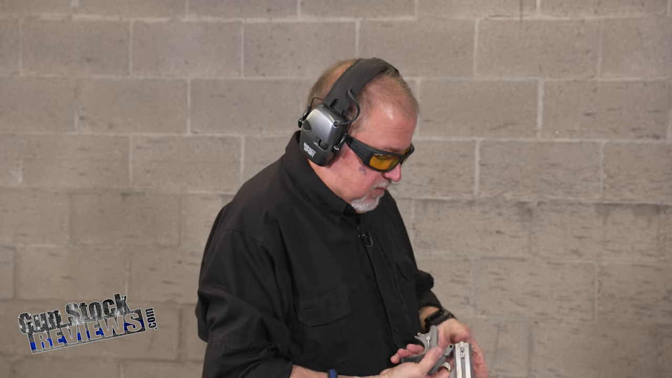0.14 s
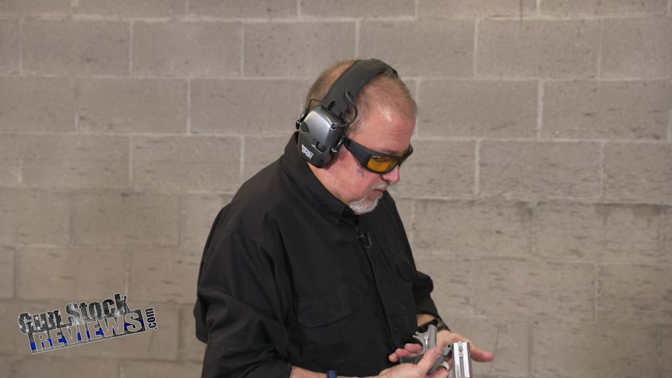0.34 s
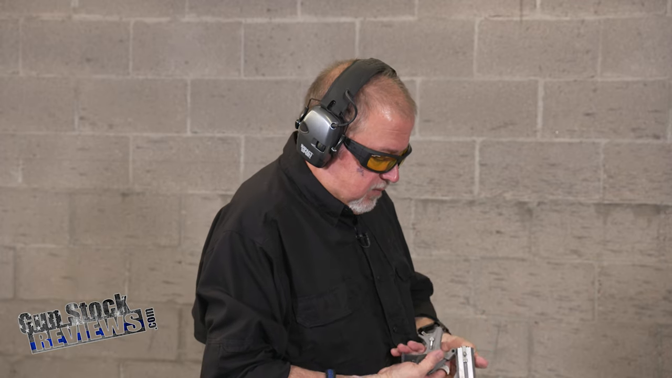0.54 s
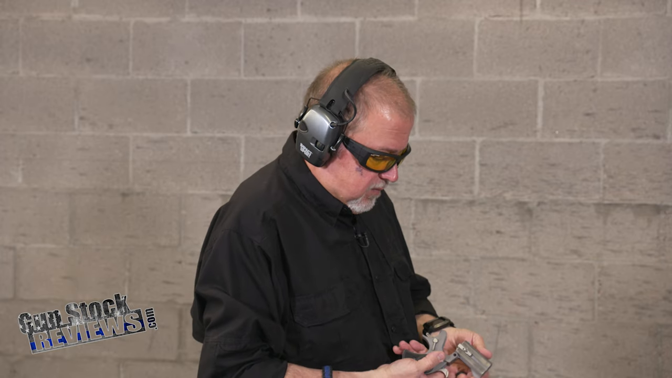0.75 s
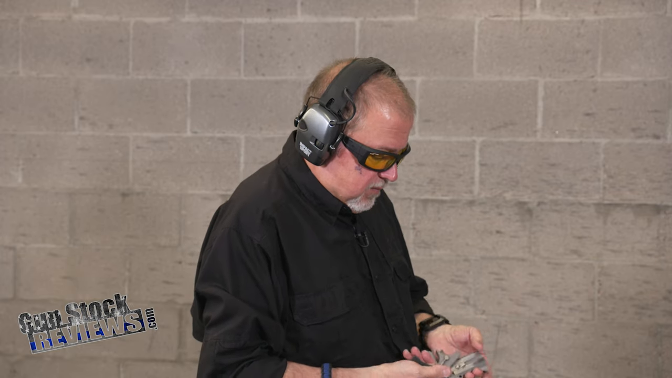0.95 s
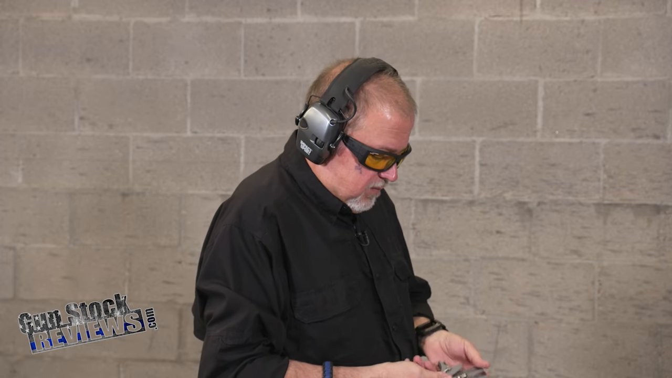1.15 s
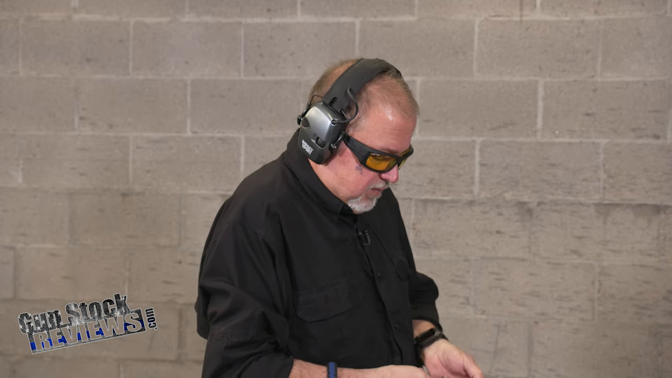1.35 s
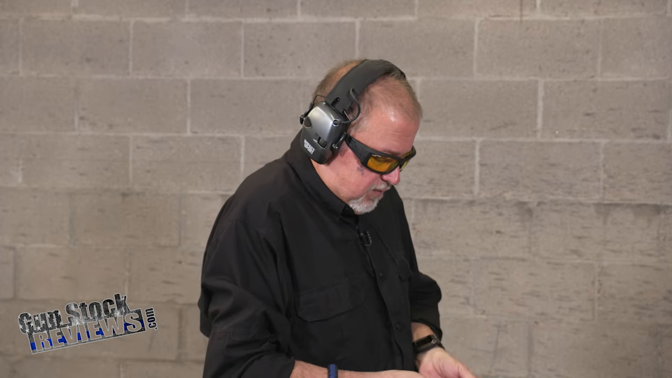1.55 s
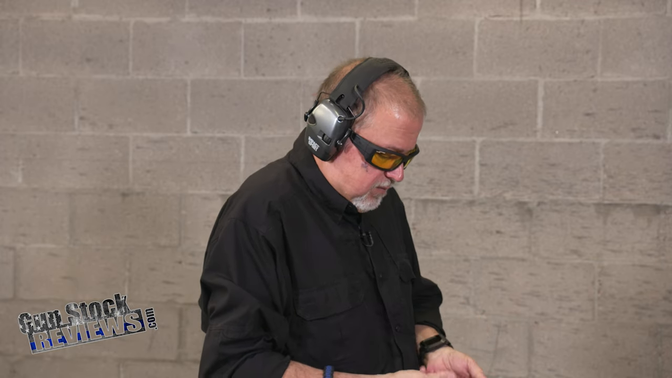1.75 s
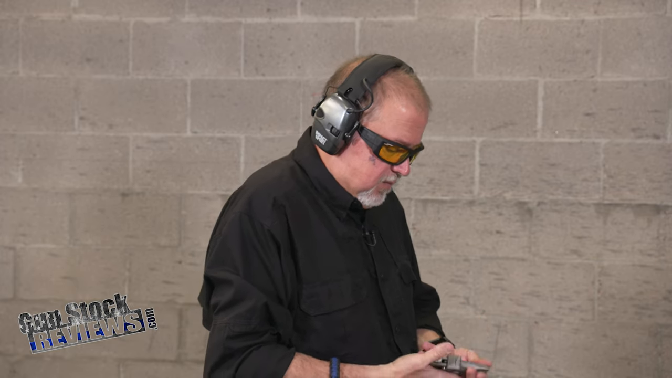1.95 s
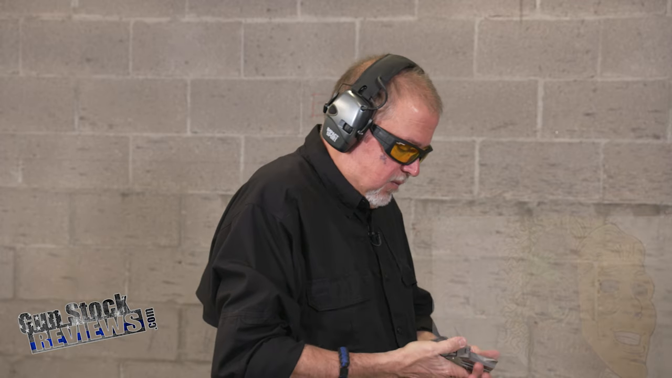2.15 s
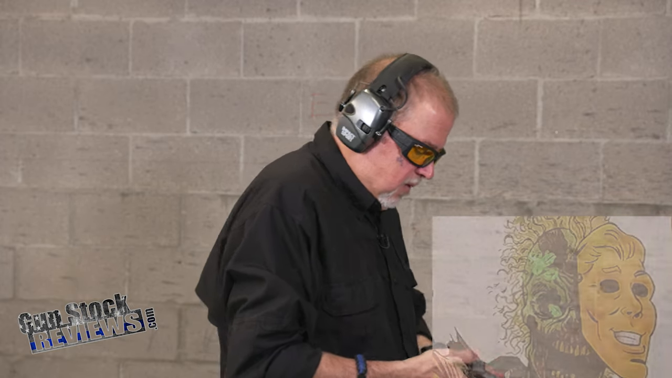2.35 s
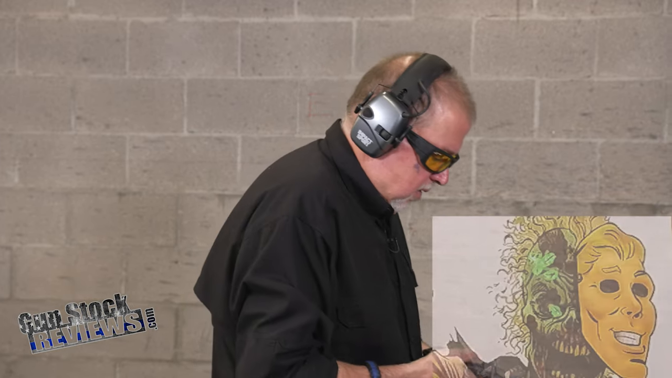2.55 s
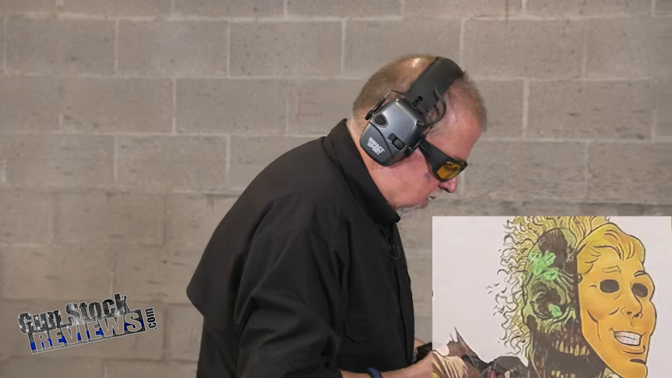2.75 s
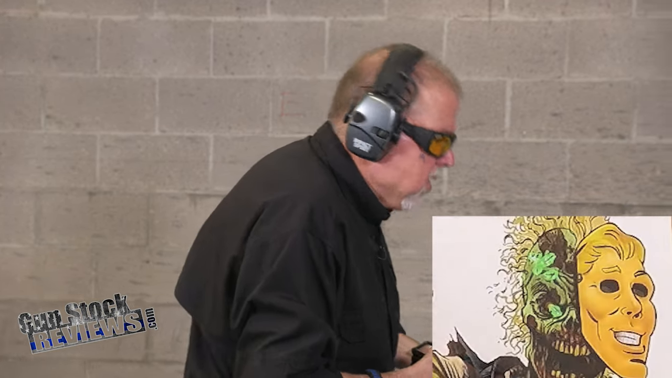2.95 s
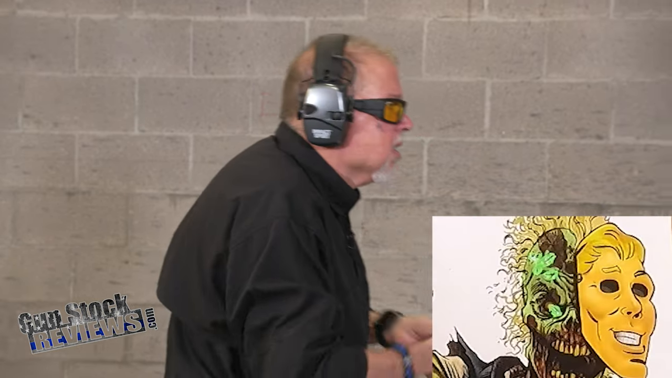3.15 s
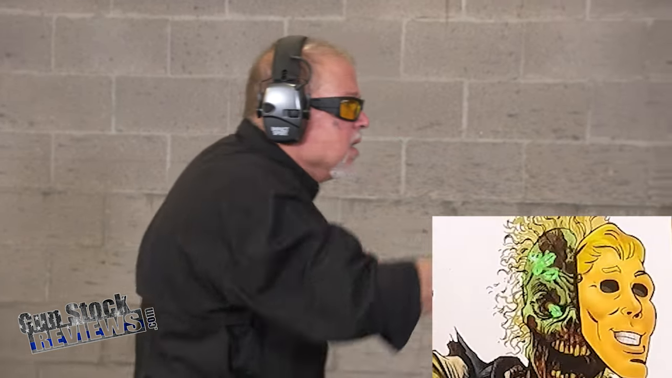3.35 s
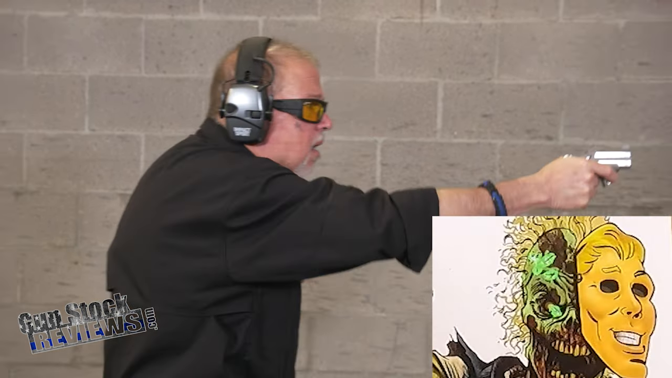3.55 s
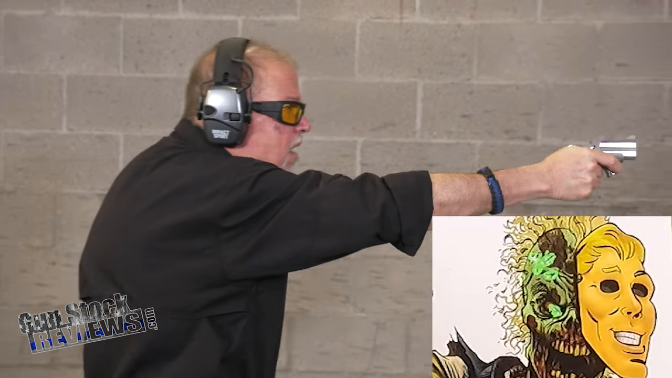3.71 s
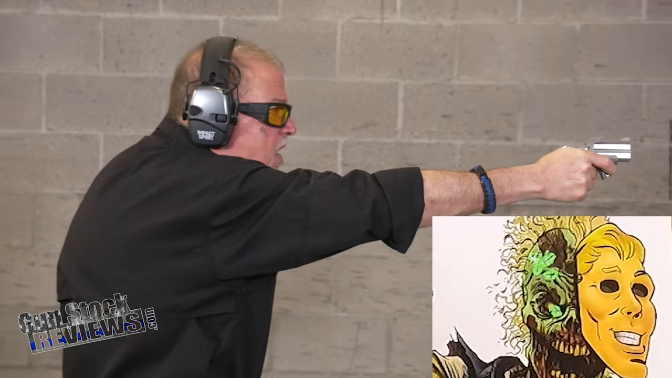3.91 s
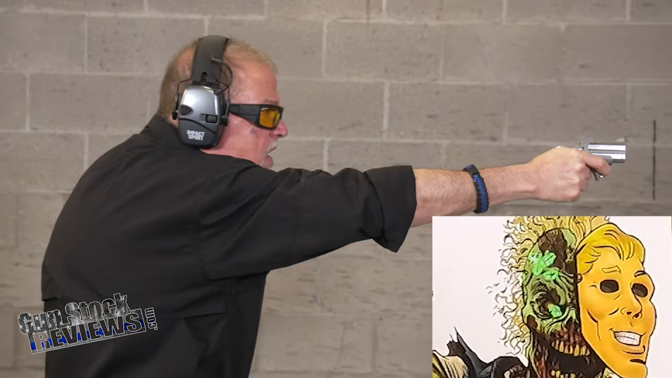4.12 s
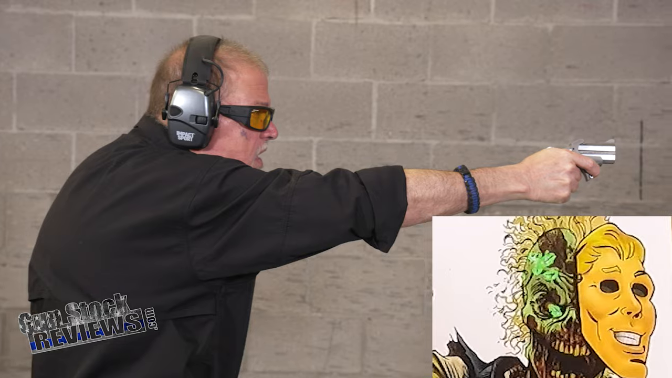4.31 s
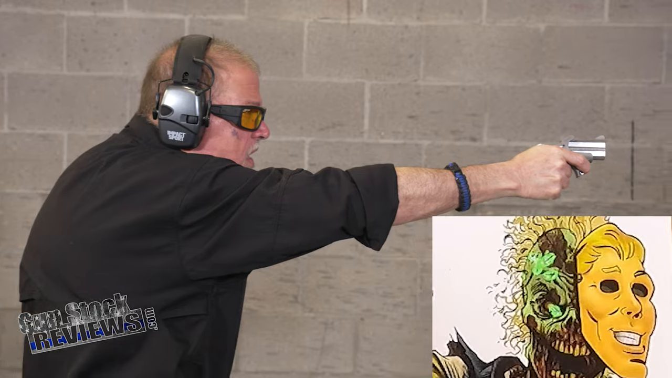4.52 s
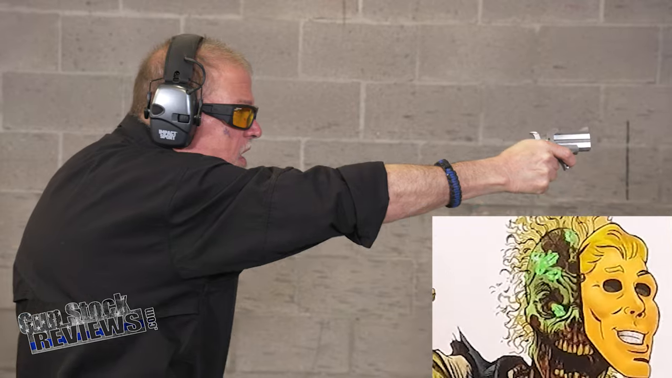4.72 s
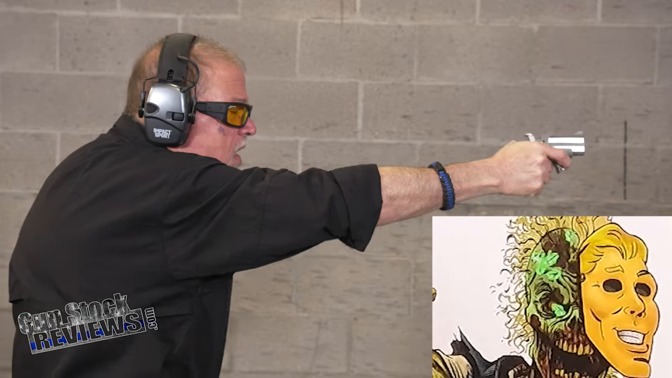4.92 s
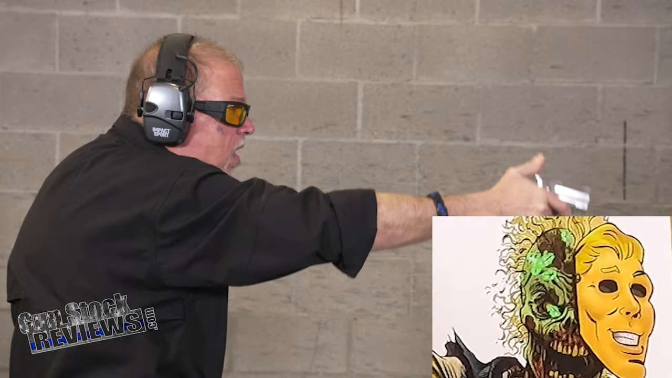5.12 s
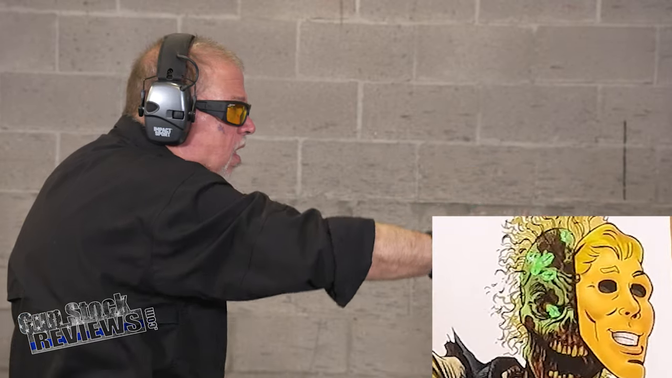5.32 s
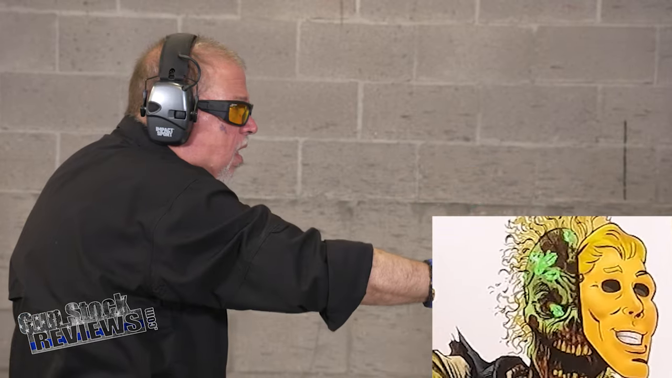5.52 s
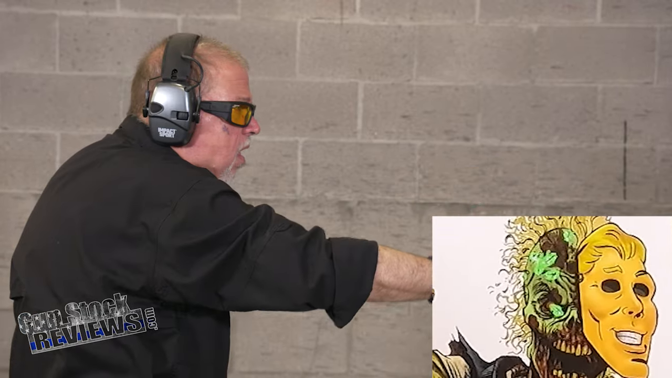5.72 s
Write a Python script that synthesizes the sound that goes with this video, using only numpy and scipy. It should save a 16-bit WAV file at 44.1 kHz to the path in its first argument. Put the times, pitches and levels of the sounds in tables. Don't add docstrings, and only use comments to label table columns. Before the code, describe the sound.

Quiet room air, light metallic clicks as a small pistol is loaded and cocked, then a single huge shot with a long ringing indoor tail.

```python
import sys
import numpy as np
from scipy import signal
from scipy.fft import rfft, irfft, next_fast_len
from scipy.io import wavfile
from scipy.ndimage import uniform_filter1d, map_coordinates

SR = 44100
rng = np.random.default_rng(int(sys.argv[2]) if len(sys.argv) > 2 else 0)


def volts_from_decibels(level):
    exponent = np.asarray(level, float) / 20
    return 10 ** exponent


def inscribe(sig):
    pcm = np.round(np.clip(np.atleast_2d(sig).T, -1, 1) * 32767)
    wavfile.write(sys.argv[1], SR, pcm.astype(np.int16))


N = 254456
T = np.arange(N) / SR

# (frequency [Hz], density [dB per Hz])
AIR_SPECTRUM = [(12, -22), (20, -1), (38, -0.5), (65, -2.5), (107, 2.5), (204, -9), (357, -7.5),
                (558, -12.5), (698, -13.5), (2990, -21), (4180, -27.5), (7500, -40), (12500, -46),
                (16000, -54)]
# (time [s], level [dB])
AIR_LEVEL = [
    (0.0, -58.5),
    (1.33, -57.5),
    (1.7, -59.5),
    (2.36, -57.5),
    (2.86, -59.5),
    (3.66, -55.5),
    (3.85, -57),
    (4.65, -57.5),
]
# (frequency [Hz], density [dB per Hz])
CLOTH_SPECTRUM = [(200, -2.5), (1000, -1.5), (3000, 1.5), (6500, 1.5), (10000, -11), (15000, -13)]
# (time of strongest rub [s], level [dB], swell over 20 dB [s], fade over 20 dB [s])
ARM_RUBS = [(.05, -74, .05, 0.065), (.503, -68.5, .03, .03), (.55, -76, .03, 0.14), (.9, -71.5, 0.27, 0.26),
            (1.1, -65.5, .03, .14), (1.305, -58, 0.058, 0.036), (1.68, -68.5, 0.11, 0.19),
            (1.84, -68.5, .08, 0.11), (1.915, -62, 0.051, 0.12), (2.44, -73, .03, .05),
            (2.575, -64, .08, 0.12), (3.04, -69, .1, 0.11), (3.53, -67, 0.46, 0.21),
            (3.65, -61, 0.077, 0.18)]
# (time [s], peak level [dB], frequency [Hz])
BRIGHT_TICKS = [(0.0782, -40, 6300), (1.436, -54, 4610), (1.8044, -58.5, 8500), (2.996, -52, 9550),
                (3.0174, -59, 10000), (3.0394, -58, 8500), (3.0659, -50.5, 6000), (3.0814, -58, 8000),
                (3.0964, -54, 6010), (3.5124, -58, 6380), (3.6232, -55.5, 6800), (3.7744, -63, 10000),
                (3.8344, -60, 9000), (4.3294, -66, 7000), (4.341, -66, 9000)]
# (time [s], peak level [dB], frequency [Hz])
DULL_TICKS = [
    (1.048, -39, 230),
    (2.6, -42, 320),
    (1.0729, -37, 1800),
    (1.294, -43, 2000),
    (1.9155, -54, 2000),
]

# (time [s], peak level [dB], scrape [ms], broad crack [dB])
ROUND_LOADED = [
    [(2520, 130, -13), (4740, 190, 8), (5560, 580, -3.5), (8500, 120, -15), (10100, 310, -33), (14600, 180, -36)],
    [(1.0371, -21.5, 0.77, -21), (1.0405, -27, 0.59, -14), (1.0474, -36, 1.7, -10), (1.0605, -54, 0.48, -10), (1.0729, -38.5, 0.57, 4)],
]
LATCH_MOVED = [
    [(4250, 200, 3), (5230, 350, 0), (5600, 190, 1.5), (6300, 270, -6.5), (7930, 250, -18), (9400, 530, -11.5), (11900, 260, -21), (13400, 300, -7.5), (15190, 280, -7.5)],
    [(1.3183, -26.5, .7, -10.5), (1.3217, -15.5, 1.1, -23), (1.3288, -25, 1.3, -18)],
]
BARREL_CLOSED = [
    [(2420, 200, -5.5), (4550, 320, -7), (5250, 700, -4.5), (7940, 600, -13), (10230, 320, -4.5), (12400, 250, -10), (13540, 300, -7), (15200, 470, -10.5)],
    [(1.4722, -39.5, 0.99, -8), (1.4755, -14, .6, -6.5), (1.4764, -8, .9, -7.5), (1.4783, -14, 1.2, -6.5), (1.482, -25, 1.8, -12.5)],
]
HAMMER_COCKED = [
    [(900, 300, -20), (2940, 200, -18), (5100, 560, -3), (6104, 470, -0.5), (8020, 260, 2.5), (8630, 520, 2), (10110, 250, -7), (10870, 893, -4), (15550, 520, -9)],
    [(2.6468, -43, .9, -9.5), (2.6499, -18.5, 0.2, -5.5), (2.6513, -6.5, 1.2, -5), (2.6562, -22, .6, -8), (2.6612, -36, 1.1, -15), (2.6673, -32.5, .9, -13.5)],
]
SEAR_CAUGHT = [
    [(859, 148, -5), (2540, 140, -8), (4200, 340, -5), (5670, 1000, 4), (8500, 890, 0.5), (10370, 320, -5.5), (12300, 200, -15.5)],
    [(2.8362, -55, .8, -25), (2.8449, -12.5, 0.31, -5), (2.8545, -36, .7, -14), (2.8615, -44, .9, -20.5)],
]
LATCH_RELEASED = [
    [(2680, 100, -12), (4850, 280, 3), (6030, 900, -10), (8800, 250, -15), (10230, 200, -15), (14300, 250, -15)],
    [(5.6145, -44, .8, -14.5), (5.629, -26.5, .6, -17), (5.6306, -13.5, 1.1, -16), (5.6335, -23.5, .7, -12), (5.6385, -26.5, 1, -6), (5.6512, -30.5, 1.2, -23.5), (5.6612, -37, 1.5, -13.5)],
]
# (diffuse answer [dB], ringing answer [dB],
# thump in the palm [dB], thump frequency [Hz], thump t60 [s])
HAND_AND_BOOTH = [
    (-62, -25, -52, 210, 0.02),
    (-53, -27, -57, 1160, 0.012),
    (-43, -25.5, -22.5, 700, .005),
    (-47, -31, -25, 530, 0.0094),
    (-57, -28, -28, 850, 0.0096),
    (-48, -12.5, -45.5, 870, 0.028),
]
# (frequency [Hz], t60 [s])
BOOTH_DECAY = [(500, 0.22), (1500, .22), (4500, .36), (10000, 0.24), (16000, .22)]
# (frequency [Hz], density [dB per Hz])
BOOTH_COLOUR = [(300, -24.5), (1500, -10), (3000, -6.5), (4300, 1.5), (6200, 1.5), (7500, -9), (11000, -13),
                (16000, -13.5)]

# (multiple of the fundamental [1], level [dB])
FAVOURED_WAVES = [(6, -4), (7, 0), (9, -9.5), (10, 0), (15, -4.5), (22, -10.5), (25, -9.5), (38, -10),
                  (39, -7), (41, -10), (45, -11), (48, -10.5), (61, -14), (67, -18)]
# (frequency [Hz], level [dB])
OTHER_WAVES = [(90, -24), (400, -17.5), (700, -19), (1000, -15.5), (1500, -16.5), (2000, -19.5),
               (2600, -29)]
# (frequency [Hz], t60 [s])
FLUTTER_DECAY = [(120, 1), (210, 1.45), (310, 1.55), (450, 1.1), (800, 1.7), (1300, 1.65), (1900, 1.38),
                 (2500, 1.4)]
# (frequency [Hz], level [dB], t60 [s])
SLANTED_WAVES = [(126.1, -7, .9), (781, -4, 0.97), (896, -7, 1), (970, -9.5, 1), (1000, -7.5, 0.97),
                 (1102, -8, .9), (1121, -12.5, .8), (1246, -12.5, 0.98), (1305, -10.5, .9),
                 (2292, -16, 0.98), (2410, -19.5, .9)]
# (frequency [Hz], density [dB per Hz])
ROAR_SPECTRUM = [(24, -57), (40, -27.5), (239, -11.5), (473, -4.5), (550, -1.5), (608, -6), (1010, -2),
                 (1110, -1.5), (2200, -4.5), (6830, -13.5), (14200, -36.5), (16500, -44.5)]
# (frequency [Hz], t60 [s])
HALL_DECAY = [(80, 2.2), (210, 1.28), (560, 0.85), (1470, 0.85), (3880, 0.78), (7000, 0.55), (10200, 0.41),
              (16000, 0.36)]

WALL_GAP_M = 5.54
BEAT_DEPTH = 0.6
STRIKE_S, SHOT_S = 4.6626, 4.6666
LIMIT_DB, OVERSHOOT_DB, GRAB_S, SETTLE_S = -20.5, 12.5, 4.673, 0.012
HOLD_S, OPEN_DB_PER_S2 = 4.84, 650


def unit(x):
    return x / np.sqrt(np.mean(x ** 2) + 1e-20)


def along(points, hz):
    f, v = np.transpose(points)
    return np.interp(np.log(hz + 1), np.log(f + 1), v)


def filtered(x, response):
    m = next_fast_len(len(x) + 8192)
    return irfft(rfft(x, m) * response(np.fft.rfftfreq(m, 1 / SR)), m)[:len(x)]


def add(track, s, x):
    part = track[round(s * SR):][:len(x)]
    part += x[:len(part)]


def wobble(rate):
    return map_coordinates(rng.standard_normal(int(N * rate / SR) + 4), [T * rate])


def dying(t60s, size, hold=0, slow=1):
    hz, t, z = signal.stft(rng.standard_normal(size), SR, nperseg=256)
    age = t - (1 - slow) * np.minimum(t, hold)
    decay = volts_from_decibels(-60 * age / along(t60s, hz)[:, None])
    return signal.istft(z * decay, SR, nperseg=256)[1][:size]


def air():
    rush = unit(filtered(rng.standard_normal(N), lambda f: volts_from_decibels(along(AIR_SPECTRUM, f))))
    rumble = filtered(rush, lambda f: 1 / (1 + (f / 250) ** 4))
    level = volts_from_decibels(np.interp(T, *np.transpose(AIR_LEVEL)) + 0.5)
    return level * (rush - rumble + volts_from_decibels(1.1 * wobble(7)) * rumble)


def shirt():
    s, db, swell, fade = np.transpose(ARM_RUBS)[:, :, None]
    effort = volts_from_decibels(db - 20 * np.maximum((s - T) / swell, (T - s) / fade)).sum(axis=0)
    grain = volts_from_decibels(2.7 * wobble(60) + 1.5 * wobble(400))
    rub = filtered(grain * rng.standard_normal(N), lambda f: volts_from_decibels(along(CLOTH_SPECTRUM, f)))
    return effort * unit(rub)


def ticks():
    out, t = np.zeros(N), np.arange(SR // 100) / SR
    for s, db, hz in BRIGHT_TICKS + DULL_TICKS:
        ring = np.sin(2 * np.pi * hz * t) * volts_from_decibels(-60 * t / (0.009 + 4 / hz)) * np.minimum(1, t / 0.00034)
        burst = rng.standard_normal(len(t)) * volts_from_decibels(-60 * t / 0.006)
        spike = filtered(burst, lambda f: (1j * f * hz / (0.97 * hz * hz - f * f + 1j * f * hz)) ** 2)
        add(out, s, volts_from_decibels(db + 1.0) * (0.47 * ring + 0.9 * spike))
    return out


def steel_part(modes, f):
    total = 0
    for k, (centre, width, db) in enumerate(modes):
        total = total + (-1) ** k * volts_from_decibels(db) * 1j * f * width / (centre * centre - f * f + 1j * f * width)
    return total


def crack_band(f):
    return 1j * f / (1600 + 1j * f) / (1 + 1j * f / 7000)


def pistol():
    out, t = np.zeros(N), np.arange(SR // 20) / SR
    actions = (ROUND_LOADED, LATCH_MOVED, BARREL_CLOSED, HAMMER_COCKED, SEAR_CAUGHT, LATCH_RELEASED)
    for (modes, contacts), answer in zip(actions, HAND_AND_BOOTH):
        diffuse_db, ring_db, thump_db, thump_hz, thump_t60 = answer
        action, start = np.zeros(SR // 10), contacts[0][0]
        for s, db, ms, crack_db in contacts:
            u = 1000 * t / ms
            force = np.sqrt(u) * np.exp(-u * u / 2)
            scrape, crack = force * rng.standard_normal((2, len(t)))
            click = filtered(scrape, lambda f: steel_part(modes, f))
            click = click + volts_from_decibels(crack_db - 5.5) * filtered(crack, crack_band)
            add(action, s - start, volts_from_decibels(db) * click / np.abs(click).max())
        add(out, start, action)

        echo = dying(BOOTH_DECAY, size=SR // 2)
        ringing = signal.fftconvolve(action, echo / np.linalg.norm(echo))
        add(out, start + 0.004, volts_from_decibels(ring_db) * ringing)

        loudest = max(contacts, key=lambda c: c[1])[0]
        thump = volts_from_decibels(thump_db - 60 * t / thump_t60) * np.sin(2 * np.pi * thump_hz * t)
        add(out, loudest + 0.0011, thump)
        diffuse = filtered(dying(BOOTH_DECAY, size=SR // 2), lambda f: volts_from_decibels(along(BOOTH_COLOUR, f)))
        add(out, loudest + 0.003, volts_from_decibels(diffuse_db) * diffuse / diffuse[:SR // 50].std())
    return out


def walls(t):
    multiple = np.arange(3, 85)
    chance = rng.standard_normal(size=(len(multiple), 3))
    hz = multiple * 343 / (2 * WALL_GAP_M) * (1 + 0.0012 * chance[:, 0])
    db = along(OTHER_WAVES, hz) + 3 * chance[:, 1]
    for k, level in FAVOURED_WAVES:
        db[multiple == round(k)] = level
    t60 = along(FLUTTER_DECAY, hz) * np.exp(0.12 * chance[:, 2])

    waves = np.hstack([[hz, db, t60], np.transpose(SLANTED_WAVES)])
    hz, db, t60 = waves[:, :, None]
    phase = rng.uniform(0, 2 * np.pi, hz.shape)
    beat_hz = rng.uniform(0.8, 3, hz.shape)
    beat_phase = rng.uniform(0, 2 * np.pi, hz.shape)
    depth = BEAT_DEPTH * np.clip(hz / 500 - 0.7, 0, 1)
    beat = 1 + depth * np.cos(2 * np.pi * beat_hz * t + beat_phase)
    decay = volts_from_decibels(db - 60 * np.maximum(t - 0.39, -0.1) / t60)
    ring = (beat * decay * np.sin(2 * np.pi * hz * t + phase)).sum(axis=0)
    return ring / (1 + volts_from_decibels(-120 * (t - 0.21)))


def shot():
    out, t = np.zeros(N), np.arange(N - round(SHOT_S * SR)) / SR

    def band(hz, steep):
        noise = rng.standard_normal(len(t))
        return unit(filtered(noise, lambda f: (f / hz) ** steep / (1 + (f / hz) ** (steep + 2.18))))

    pin = volts_from_decibels(-29 - 60 * t / 0.03) * band(4200, 2.5)
    add(out, STRIKE_S, pin)
    jet = volts_from_decibels(-11 - 60 * t / 0.035) * band(3900, 3) * np.minimum(1, 0.3 + t / 0.0012)
    blast = volts_from_decibels(22 - 60 * t / 0.06) * band(1250, 1.5)
    reverberation = dying(HALL_DECAY, size=len(t), hold=0.24, slow=0.71)
    roar = filtered(reverberation, lambda f: volts_from_decibels(along(ROAR_SPECTRUM, f)))
    roar /= roar[:SR // 10].std()
    uncorked = 1 / (1 + volts_from_decibels(-40 * (1000 * t - 2.9)))
    dull = filtered(band(1300, 1.5), lambda f: 1 / (1 + (f / 3000) ** 4))
    back = volts_from_decibels(-24 - 4 * ((t - 0.26) / 0.06) ** 2) * dull
    add(out, SHOT_S, jet + uncorked * (blast + volts_from_decibels(-9.5) * roar) + back + volts_from_decibels(-29.5) * walls(t))
    return out


def scene():
    return (air() + shirt() + ticks() + pistol() + shot())[None]


def roll_off(x):
    return signal.sosfilt(signal.butter(12, 16800, fs=SR, output="sos"), x)


def record(dry):
    clipped = dry / (1 + np.abs(dry / 0.9) ** 4) ** (1 / 4)
    level = np.sqrt(np.abs(uniform_filter1d(clipped ** 2, size=600, axis=1)))
    late_db = OVERSHOOT_DB * np.exp(-np.maximum(T - GRAB_S, 0) / SETTLE_S)
    opening_db = OPEN_DB_PER_S2 * np.maximum(T - HOLD_S, 0) ** 2
    ceiling = volts_from_decibels(np.minimum(LIMIT_DB + late_db + opening_db, 0))
    held = clipped / (1 + (level / ceiling) ** 6) ** (1 / 6)

    def coupling(f):
        return 1j * f / (100 + 1j * f) * 1j * f / (45 + 1j * f) / (1 + (f / 16200) ** 60)

    mix = filtered(held[0], coupling)[None]
    return roll_off(mix)


dry = scene()
out = record(dry)
inscribe(out)
```